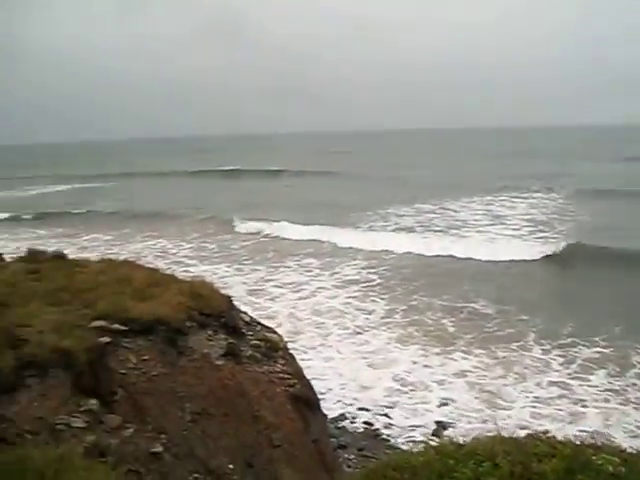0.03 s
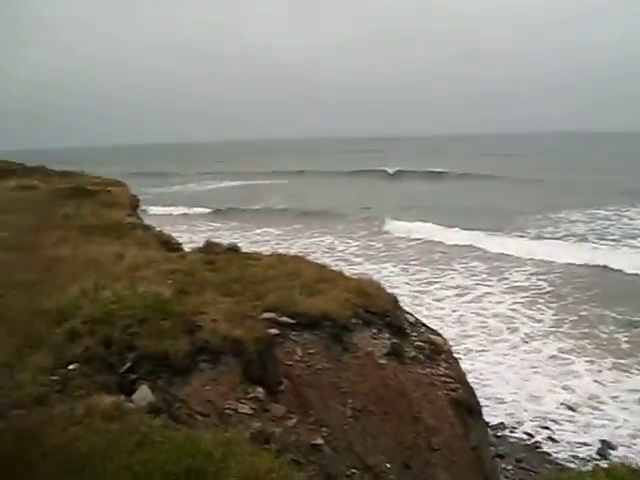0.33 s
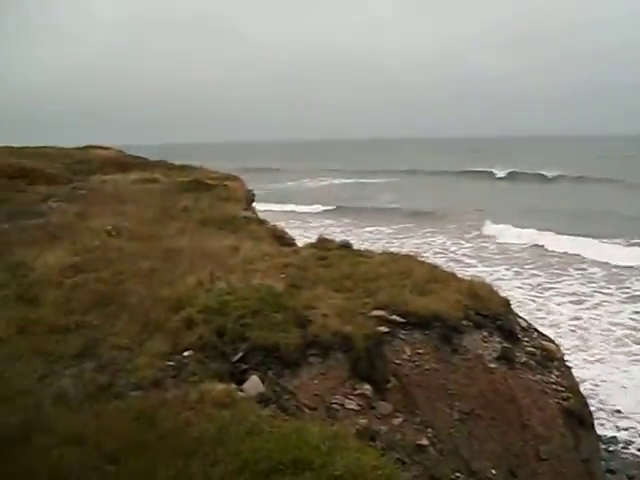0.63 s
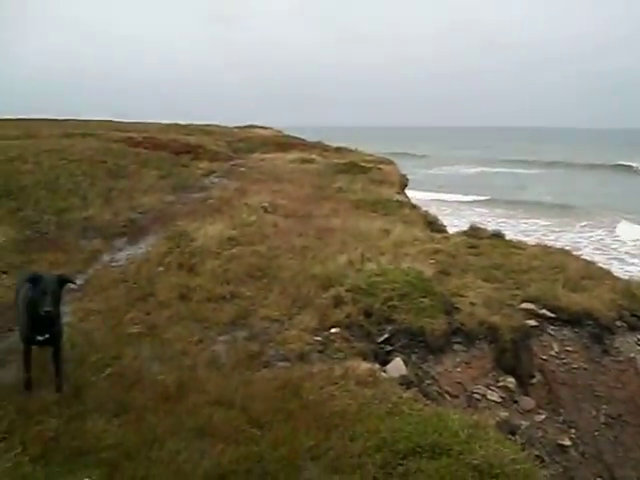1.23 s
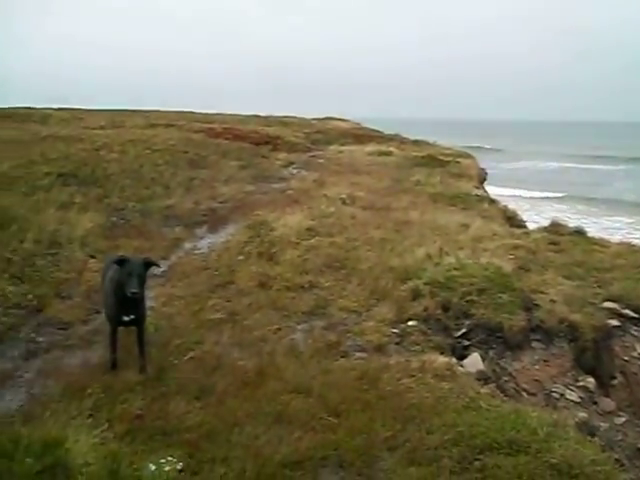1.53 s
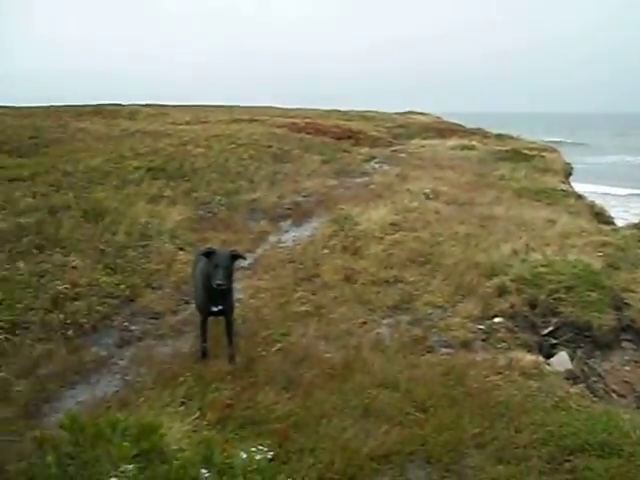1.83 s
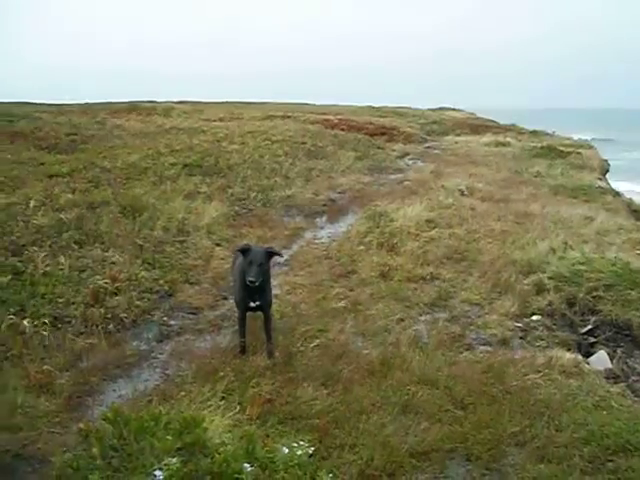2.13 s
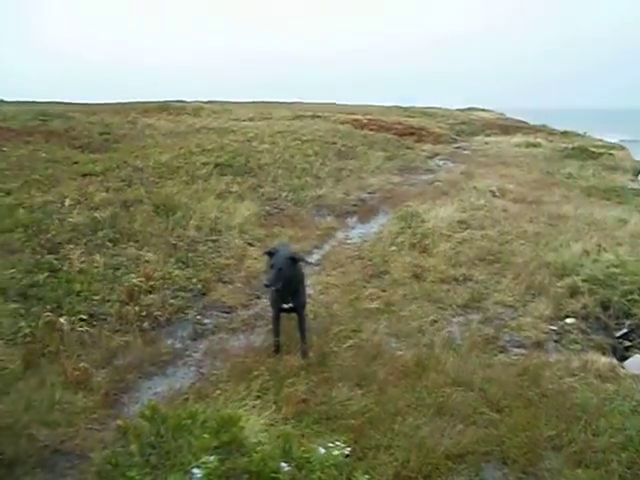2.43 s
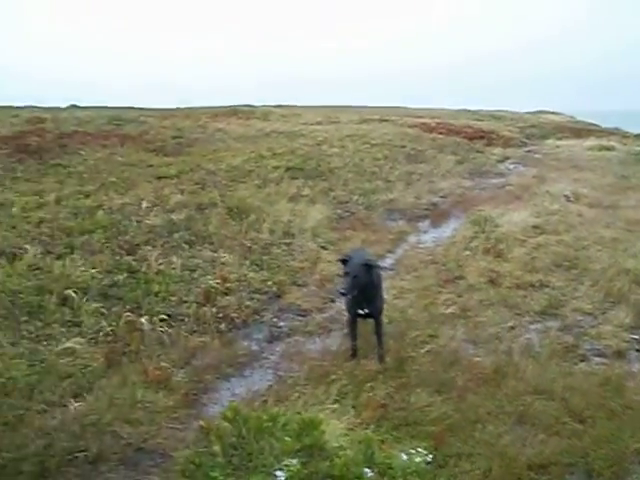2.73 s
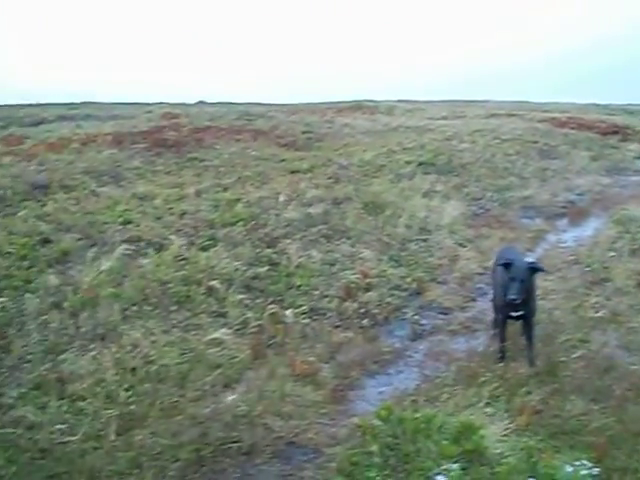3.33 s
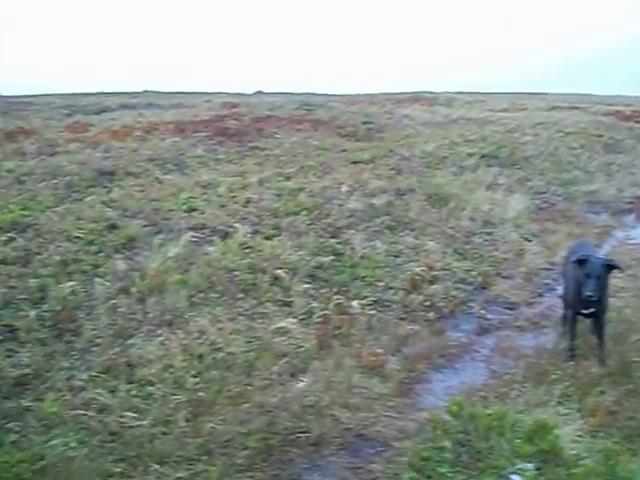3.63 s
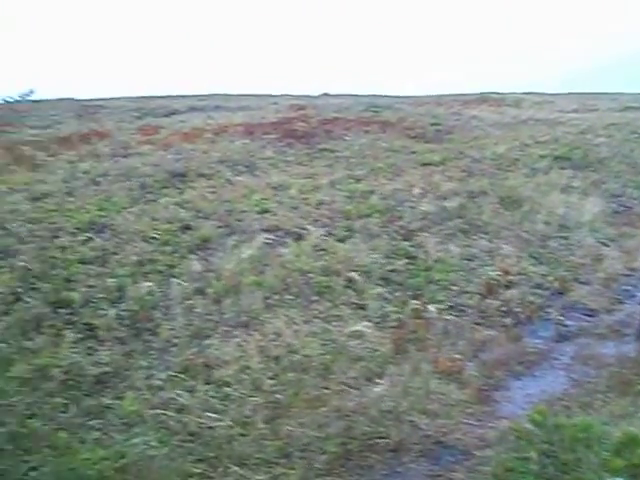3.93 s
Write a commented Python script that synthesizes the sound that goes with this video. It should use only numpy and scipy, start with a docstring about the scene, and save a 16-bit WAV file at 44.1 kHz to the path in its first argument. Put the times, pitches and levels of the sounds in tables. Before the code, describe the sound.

Steady sea surf, with wind rumbling on the microphone and raindrops ticking nearby.

```python
"""Surf, wind and rain on a cliff top

Surf washes below and changes colour as the camera turns inland. Turbulent gusts rumble
on the microphone and fine rain patters on the grass. Single drops strike a hood and the
camera body, exciting damped resonances; two land so close that they overload the microphone."""
import sys
import numpy as np
from scipy import signal
from scipy.io import wavfile

SR = 44100
rng = np.random.default_rng(int(sys.argv[2]) if len(sys.argv) > 2 else 0)


def bounce(signal):
    """Save signal as a 16-bit WAV file at the path given by the first command-line argument."""
    frames = np.transpose(np.atleast_2d(signal))
    limited = np.clip(frames, -1, 1)
    pcm = np.round(limited * 32767).astype(np.int16)
    wavfile.write(sys.argv[1], SR, pcm)


N = 176400


def surf():
    """Incoherent summation: far breakers merge into a wash whose colour follows the camera's turn."""
    # Surf spectrum in four directions: facing the sea, side-on, turned back toward the sea, inland:
    # frequency_hz, relative_density_db
    facing = [(60, -0.5), (200, 0), (600, 0.5), (1080, -4.5), (1400, -16), (1800, -17.5), (2450, -11.5),
              (3200, -8), (3750, -16.5), (4900, -15.5), (5500, -17), (6300, -38)]
    side_on = [(60, -11), (200, 5), (600, 5.5), (950, 1), (1350, -13), (1750, -4), (2300, -10.5),
               (3200, -10.5), (4600, -10), (5200, -17.5), (5700, -22.5), (6300, -27.5)]
    back_to_sea = [(60, 1.5), (200, 6), (550, 6.5), (900, 0), (1300, -13), (1900, -5.5), (2600, -12),
                   (3400, -14.5), (4500, -12.5), (5600, -20.5), (6300, -34.5)]
    inland = [(60, 7), (200, 3.5), (550, 6.5), (900, 0), (1300, -14.5), (1900, -7.5), (2500, -10.5),
              (3400, -15.5), (4500, -13), (5600, -22), (6300, -36.5)]
    # When the camera faces each direction: time_s
    turn_s = [.16, 1.148, 2.101, 3.1]
    # Swell of the surf: time_s, level_db
    swell = [(0, -25), (.4, -27), (.9, -27.5), (1.4, -26.5), (1.95, -26), (2.5, -26.5), (3.1, -27.5),
             (3.55, -29), (4, -29.5)]

    def colour_db(hz):
        views_db = [at_hz(view, hz) for view in (facing, side_on, back_to_sea, inland)]
        return np.interp(np.arange(N) / SR, turn_s, views_db)

    edges_hz = np.r_[np.geomspace(50, 1000, 11), np.geomspace(1000, 6800, 27)[1:]]
    wash = banded_noise(edges_hz, colour_db, flicker_db=1.0, rate_hz=33)
    return from_db(in_time(swell)) * wash


def wind():
    """Turbulent pressure: eddies at the microphone make a lumpy rumble with a higher rush above it."""
    # Spectra of the rumble and the rush: frequency_hz, relative_density_db
    rumble_spectrum = [(15, -8), (25, -4.5), (42, 1), (65, -1), (110, -3), (180, -5), (280, -13.5),
                       (450, -24.5), (800, -31.5), (1500, -34.5)]
    rush_spectrum = [(80, -0.5), (170, -1.5), (330, 3), (530, 0.5), (850, -26), (1400, -39)]
    # Gust envelopes of the rumble and the rush: time_s, level_db
    rumble_level = [(0, -32), (.3, -32), (.45, -27), (.56, -22), (.66, -30.5), (.87, -22.5), (.96, -24),
                    (1.04, -22), (1.11, -30.5), (1.32, -22), (1.65, -32.5), (1.78, -22), (1.9, -24),
                    (2.03, -29), (2.3, -22), (2.55, -25.5), (2.89, -28), (3.07, -22.5), (3.43, -21.5),
                    (3.49, -31), (3.66, -23), (3.82, -23), (4, -25.5)]
    rush_level = [(0, -51), (.7, -40), (1.0, -29), (1.35, -37.5), (1.6, -28.5), (1.78, -23.5), (1.9, -25.5),
                  (2.02, -30), (2.27, -26), (2.65, -43), (3.1, -32.5), (3.4, -36), (3.55, -48), (4, -50)]
    edges_hz = np.geomspace(16, 1448, 14)
    rumble = banded_noise(edges_hz, lambda hz: at_hz(rumble_spectrum, hz), flicker_db=1, rate_hz=17)
    rush = banded_noise(edges_hz, lambda hz: at_hz(rush_spectrum, hz), flicker_db=1.4, rate_hz=17)
    return from_db(in_time(rumble_level)) * rumble + from_db(in_time(rush_level)) * rush


def buffets():
    """Pressure pulses: each strong eddy thumps the microphone with a Gaussian swell of low noise."""
    # Single eddies: centre_s, level_db, pitch_hz, half_length_s
    eddies = [(.483, -23, 160, .012), (0.597, -15.5, 134, 0.017), (0.9, -18.5, 135, .017),
              (1.048, -24, 188, 0.015), (1.772, -17, 193, 0.023), (2.946, -21, 130, 0.023),
              (3.442, -19, 109, 0.012), (3.736, -17.5, 85, 0.043)]
    spread = 1.75  # frequency ratio from the pitch to either band edge
    out, t = np.zeros(N), np.arange(N) / SR
    for centre_s, level_db, hz, half_length_s in eddies:
        band = signal.butter(2, [hz / spread, hz * spread], "band", fs=SR, output="sos")
        swell = np.exp(-((t - centre_s) / half_length_s) ** 2)
        eddy = swell * signal.sosfilt(band, rng.standard_normal(N))
        out += from_db(level_db) * eddy * np.sqrt(np.sum(swell ** 2) / np.sum(eddy ** 2))
    return out


def near_drops():
    """Impact excitation: a drop ticks, bursts and rings the camera body; a hollow thud follows."""
    # Close raindrops: start_s, tick_gain_db, tick_pitch_hz, tick_t60_s, thud_gain_db, thud_pitch_hz
    drops = [(0.103, -17.5, 2320, 0.0097, -37, 800), (0.122, -20, 2520, 0.009, -28, 800),
             (0.164, -22, 2540, 0.006, -7.5, 960), (0.4702, -25, 2000, 0.0045, -26, 700),
             (0.5046, -19, 2680, 0.0046, -11, 523), (0.5953, -13, 2300, 0.012, -4, 480),
             (.6372, -26, 4670, .004, -16, 523), (.790, -36, 2000, .004, -9, 625),
             (1.3292, -14, 2300, 0.0037, -8.5, 870), (1.4112, -14.5, 5000, 0.0064, -37, 700),
             (2.422, -13.5, 4600, 0.009, -32, 790), (2.4445, 2.5, 3100, 0.0038, -32, 900),
             (2.6997, -18, 5150, 0.005, -34, 700), (2.7655, -18.5, 2200, 0.012, -17, 700),
             (2.8364, 10, 4370, 0.0053, -35, 1040), (2.9657, -15.5, 3070, 0.0017, -40, 706),
             (3.186, -15, 5400, 0.0051, -35.5, 700), (3.267, -20.5, 2300, 0.01, -41, 690),
             (3.4075, -10, 4900, 0.0063, -4.5, 770), (3.608, -27, 3470, .004, -14, 900),
             (3.85, -21, 5130, 0.0038, -34, 710), (3.9425, -26, 3650, 0.0087, -14.5, 950)]
    # Modes of the camera body: pitch_hz, level_re_tick_db, t60_s
    modes = [(1170, -21.5, 0.025), (1543, -12.5, 0.014), (1950, -18, 0.034), (2300, -15, 0.021),
             (3085, -19, 0.015), (3380, -21.5, 0.025), (4030, -11.5, 0.005), (4820, -18.5, 0.0086),
             (4900, -11, 0.0047)]
    splash_db, splash_rise_s = -10.5, 0.0012  # level relative to the tick
    thud_t60_cycles, thud_lag_s = 6.8, 0.00103
    contact_ratio, contact_top_hz = 1.53, 5140
    out, click = np.zeros(N + SR), signal.unit_impulse(SR // 10)
    age = np.arange(len(click)) / SR / splash_rise_s
    body = sum(from_db(db) * tick(click, hz, t60) * (-1) ** k for k, (hz, db, t60) in enumerate(modes))
    splash_band = signal.butter(3, [1450, 5400], "band", fs=SR, output="sos")
    for start_s, tick_db, hz, t60, thud_db, thud_hz in drops:
        spray = rms_one(signal.sosfilt(splash_band, rng.standard_normal(len(click))))
        splash = from_db(splash_db) * age * np.exp(1 - age) * spray
        # A soft contact carries little far above its own pitch.
        contact = signal.butter(5, min(contact_ratio * hz, contact_top_hz), fs=SR, output="sos")
        crack = signal.sosfilt(contact, tick(click, hz, t60) + body + splash)
        hollow = signal.butter(1, thud_hz / 2, "high", fs=SR, output="sos")
        thud = signal.sosfilt(hollow, ring(click, thud_hz, thud_t60_cycles / thud_hz))
        start, late = int(start_s * SR), int((start_s + thud_lag_s) * SR)
        out[start:start + len(click)] += from_db(tick_db) * crack
        out[late:late + len(click)] += from_db(thud_db) * thud
    return out[:N]


def patter():
    """Shot noise: fine rain on grass is a Poisson stream of tiny ticks of random size and pitch."""
    drops_per_s, level_db, spread_db, t60_cycles = 220, -46, 3.5, 2.2
    pitches_hz = np.geomspace(700, 4800, 16)
    sizes = from_db(spread_db * np.minimum(rng.exponential(1, N), 4))
    signs = rng.choice([-1, 1], N)
    clicks = sizes * signs * (rng.random(N) < drops_per_s / SR)
    pitch_index = rng.integers(0, len(pitches_hz), N)
    ticks = sum(tick(clicks * (pitch_index == k), hz, t60_cycles / hz) for k, hz in enumerate(pitches_hz))
    return from_db(level_db) * rms_one(ticks)


def banded_noise(edges_hz, colour_db, flicker_db, rate_hz):
    """Amplitude modulation: noise bands follow colour_db(hz) and flicker partly together; rms 1."""
    out, together = 0, drift(rate_hz)
    for low, high in zip(edges_hz, edges_hz[1:]):
        bandpass = signal.butter(2, [low, high], "band", fs=SR, output="sos")
        band = signal.sosfilt(bandpass, rng.standard_normal(N + SR // 2))[-N:]
        flicker = 0.63 * together + 0.83 * drift(rate_hz)
        out = out + band * from_db(colour_db(np.sqrt(low * high)) + flicker_db * flicker)
    return rms_one(out)


def drift(rate_hz):
    """Low-pass noise: a smooth random wandering of rms 1."""
    hop, settle = 40, 2000
    pole = np.exp(-2 * np.pi * rate_hz * hop / SR)
    noise = rng.standard_normal(N // hop + settle + 2)
    slow = signal.lfilter([1], [1, -2 * pole, pole * pole], noise)[settle:]
    return np.interp(np.arange(N) / hop, np.arange(len(slow)), rms_one(slow))


def ring(clicks, hz, t60):
    """Damped oscillator: a unit click starts a unit sine that falls 60 dB in t60 seconds."""
    r, w = np.exp(-np.log(1000) / (t60 * SR)), 2 * np.pi * hz / SR
    return signal.lfilter([0, np.sin(w)], [1, -2 * r * np.cos(w), r * r], clicks + 1e-18)


def tick(clicks, hz, t60):
    """Differentiation takes the bass out of a ring."""
    return np.diff(ring(clicks, hz, t60), prepend=0) * SR / (2 * np.pi * hz)


def from_db(db):
    """Decibels to amplitude ratio."""
    return 10 ** (np.asarray(db) / 20)


def rms_one(x):
    """Normalisation to unit rms."""
    return x / np.sqrt(np.mean(x ** 2) + 1e-20)


def in_time(rows):
    """Linear interpolation of a (time_s, value) curve at every sample."""
    return np.interp(np.arange(N) / SR, *np.transpose(rows))


def at_hz(points, hz):
    """Interpolation of a spectrum on a log-frequency axis."""
    frequency_hz, db = np.transpose(points)
    return np.interp(np.log(hz), np.log(frequency_hz), db)


def scene():
    """Superposition: all the pressures add at one microphone."""
    return (surf() + wind() + patter() + near_drops() + buffets())[None]


def record(dry):
    """Saturation: the microphone overloads, its band is narrowed, and overshoot stops at full scale."""
    overload = 0.98  # of full scale
    band_edge = signal.cheby2(16, 70, 7050, fs=SR, output="sos")
    top_cut = signal.cheby2(12, 70, 16000, fs=SR, output="sos")
    narrow = signal.sosfilt(band_edge, np.clip(dry, -overload, overload))
    return signal.sosfilt(top_cut, np.clip(narrow, -1, 1))


dry = scene()
out = record(dry)
bounce(out)
```